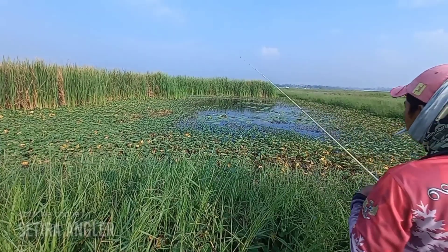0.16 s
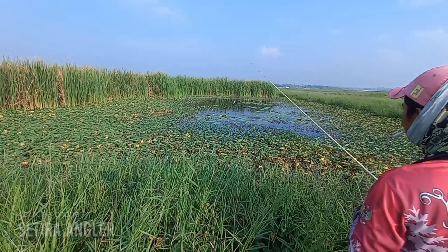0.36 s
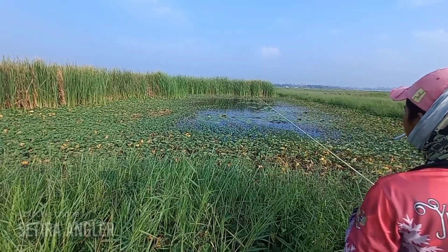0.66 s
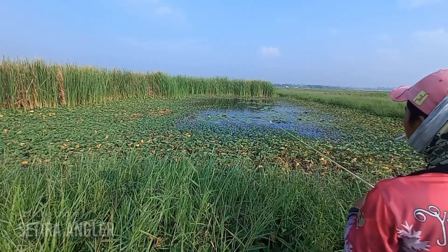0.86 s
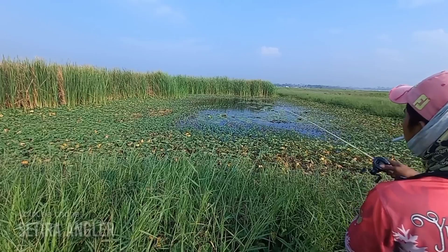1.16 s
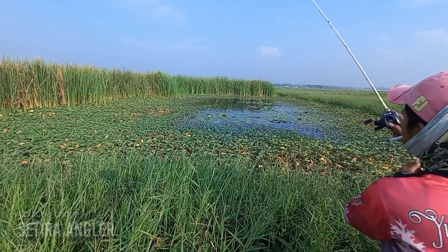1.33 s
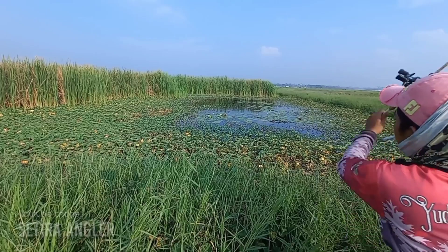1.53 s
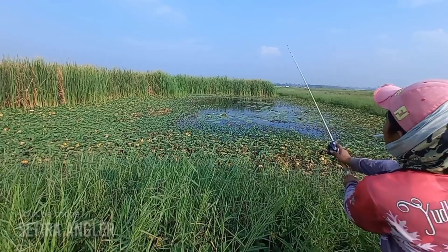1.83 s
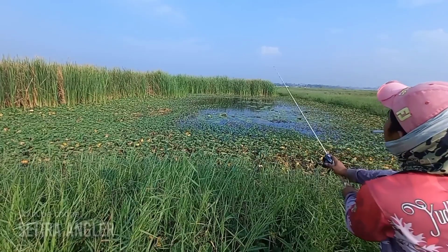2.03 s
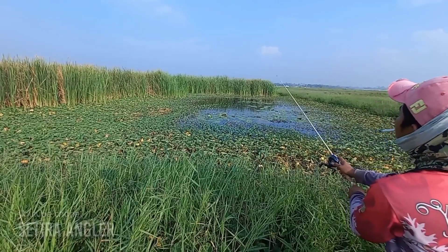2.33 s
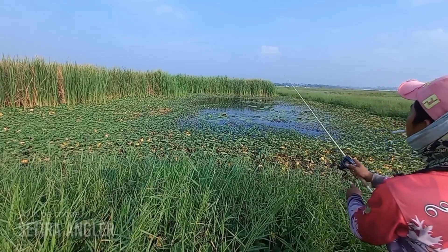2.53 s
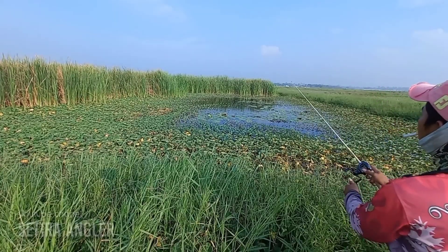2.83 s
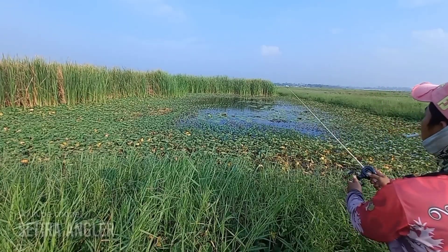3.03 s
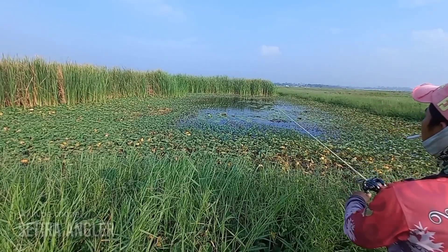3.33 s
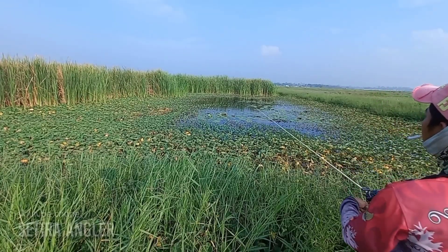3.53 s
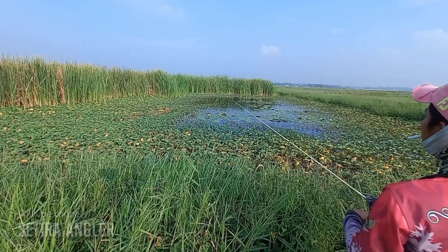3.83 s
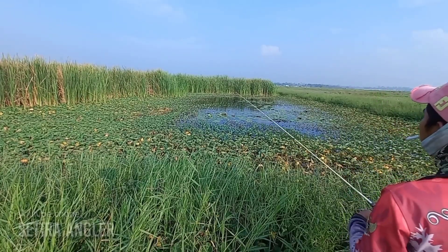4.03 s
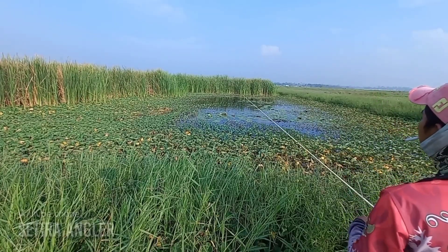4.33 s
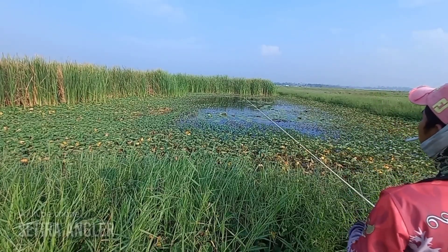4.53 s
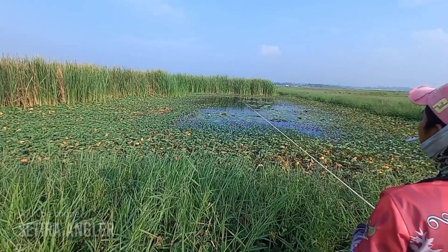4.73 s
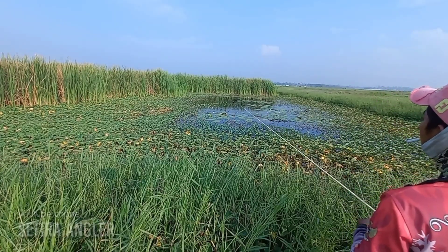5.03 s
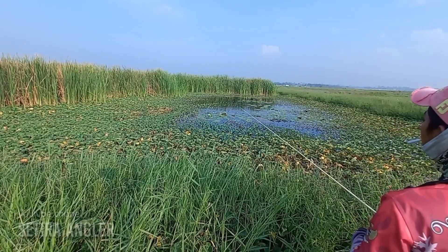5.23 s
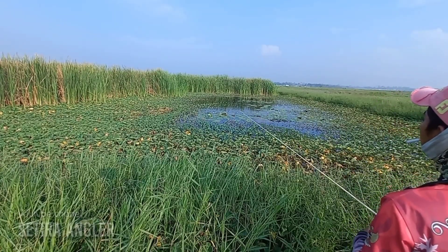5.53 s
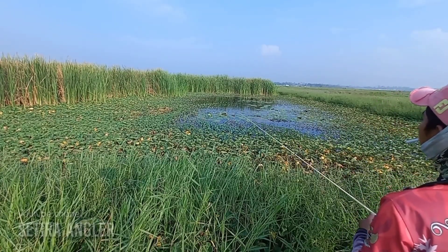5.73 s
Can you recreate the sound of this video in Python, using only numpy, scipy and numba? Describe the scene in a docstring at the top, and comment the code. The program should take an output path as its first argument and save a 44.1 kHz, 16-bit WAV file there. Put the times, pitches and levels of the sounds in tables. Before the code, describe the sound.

A fishing cast beside reeds: sharp reel click, quick whoosh and fading line hiss, then another click, amid shrill insects, wind rumble and distant engines.

```python
"""Casting over a marsh

An angler close by on the right clicks the reel free, swishes the rod, lets line whir out and clicks it back in.
Clicks are noise cracks with ringing metal modes; swish and line are shaped noise.
Bush crickets chirp as pulsed wing tones and scrapes over a far chorus, and birds call in gliding whistles
and blurred bands. Two far boat engines thud as filtered firings, under noise for light wind on the microphone."""
import sys
import numpy as np
from scipy import signal
from scipy.fft import rfft, irfft, next_fast_len
from scipy.io import wavfile
from scipy.ndimage import uniform_filter1d
from numba import njit

SR = 44100
rng = np.random.default_rng(int(sys.argv[2]) if len(sys.argv) > 2 else 0)


def unload_audio(sound):
    """Save the sound as a 16-bit wav file, at the path given as the first command line argument."""
    columns = np.transpose(np.atleast_2d(sound))
    # keep every value between -1 and 1, then stretch to whole-number steps
    steps = np.round(np.clip(columns, -1, 1) * 32767)
    wavfile.write(sys.argv[1], SR, steps.astype(np.int16))


N = 259308
TIME = np.arange(N) / SR


def undb(db):
    """Decibels to amplitude gain."""
    return 10 ** (np.asarray(db) / 20)


def unit(x):
    """Scale to rms 1."""
    return x / np.sqrt(np.mean(x ** 2))


def curves(rows):
    """One value per sample for each column of a timed table."""
    s, *columns = np.transpose(rows)
    return [np.interp(TIME, s, c) for c in columns]


def walk(rate):
    """Smooth random drift with a spread near 1; rate is in new values per second."""
    hold = int(SR / rate)
    steps = np.repeat(rng.standard_normal(N // hold + 1), hold)
    smooth = uniform_filter1d(uniform_filter1d(steps, hold), hold)
    return unit(smooth)[:N]


def colour(x, points, tilt_db=0):
    """Filter by a (pitch_hz, gain_db) spectrum, tilted per octave about its middle point."""
    hz, db = np.transpose(points)
    octave = np.log2(np.maximum(np.fft.rfftfreq(x.shape[-1], 1 / SR), 1))
    gain_db = np.interp(octave, np.log2(hz), db) + tilt_db * (octave - np.log2(np.median(hz)))
    # roll off beyond both ends of the table
    high_end = 1 + (2 ** octave / hz[-1] / 2) ** 4
    low_end = 1 + (hz[0] / 2 / 2 ** octave) ** 2
    closed = 1 / high_end / low_end
    return irfft(rfft(x) * undb(gain_db) * closed, x.shape[-1])


def noise(points, gate=1):
    """Noise, unrelated left and right, gated and then coloured by a body."""
    burst = rng.standard_normal((2, N)) * gate
    padded = np.pad(burst, ((0, 0), (0, next_fast_len(N, True) - N)))
    return unit(colour(padded, points)[:, :N])


def narrow(pair, side_db):
    """Turn two unrelated signals into left and right with the given side share."""
    side = undb(side_db) * pair[1]
    return np.array([pair[0] + side, pair[0] - side]) / np.sqrt(1 + undb(2 * side_db))


def from_right(pair, count=9):
    """The angler's sound reaches the left microphone port count samples late, and partly scattered."""
    left = .5 * np.roll(pair[1], count) + .8 * pair[0]
    return np.array([left, pair[1]])


def add(out, s, sound):
    """Mix a short sound in at time s."""
    i = int(s * SR)
    out[:, i:i + sound.shape[-1]] += sound[..., :N - i]


def swells(rows):
    """Power sum of bell-shaped swells (centre_s, half_length_s, level_db)."""
    power = sum(undb(2 * db) * np.exp(-np.minimum(((TIME - s) / half) ** 2, 50)) for s, half, db in rows)
    return np.sqrt(power)


def passing(rows):
    """Gain from the time and level columns of a table, silent before and after it."""
    s, db = np.transpose(rows)[:2]
    return undb(np.interp(TIME, s, db, left=-np.inf, right=-np.inf))


@njit
def bandpass(x, hz, q):
    """State-variable band-pass with a moving centre."""
    y, band, low = np.empty(len(x)), 0., 0.
    for i in range(len(x)):
        g = np.tan(np.pi * hz[i] / SR)
        v = (band + g * (x[i] - low)) / (1 + g * (g + 1 / q))
        band, low, y[i] = 2 * v - band, low + 2 * g * v, v / q
    return y


def blur(hz, width):
    """Narrow-band sound at each port; width is a share of the centre frequency."""
    drift = np.array([walk(width * hz) + 1j * walk(width * hz) for _ in range(2)])
    return np.real(drift * np.exp(2j * np.pi * hz * TIME))


def reed_echo(x, t60):
    """Dense scatter from the reed beds, different at each port, fading 60 dB in t60 seconds."""
    t = TIME[:SR // 2]
    echo = rng.standard_normal((2, len(t))) * undb(-60 * t / t60)
    return signal.fftconvolve(x[None], echo / np.sqrt(np.sum(echo[0] ** 2)))[:, :N]


# Rumble of wind on the microphone: pitch_hz, gain_db
WIND_COLOUR = [(20, -42), (36, -25), (50, -13.5), (72, -4.5), (105, -1), (160, -2.5), (260, -8),
               (400, -17.5), (520, -22.5), (700, -40), (1500, -46.5)]
# Hiss of reeds and open air: pitch_hz, gain_db
REED_COLOUR = [(100, -10.5), (500, 8.5), (800, 1), (1300, -0.5), (2200, -6), (3500, -12), (5000, -15.5),
               (7000, -15), (15000, -18)]
# Gusts that boom on the microphone: centre_s, half_length_s, level_db
GUSTS = [(.2, 0.074, -52.5), (1.33, 0.087, -50.5), (1.68, 0.077, -50.5), (2.05, 0.087, -56),
         (2.48, 0.43, -54.5), (2.9, 0.047, -60), (3.25, 0.094, -53), (3.62, 0.033, -54.5),
         (3.86, 0.06, -54.5), (4.41, 0.025, -51), (4.75, 0.094, -54), (5.08, 0.045, -51.5),
         (5.58, 0.031, -50)]
# breeze level at the start, its slow easing, and its random buffeting
WIND_DB, WIND_EASE_DB_PER_S, BUFFET_DB, BUFFETS_PER_S = -49.5, .5, 1.5, 14
# a gust's low boom, its width as a share of its pitch, and the broad rumble that comes with it
BOOM_HZ, BOOM_WIDTH, GUST_RUMBLE_DB = 76.2, 0.17, -1.5
REEDS_DB, REEDS_EASE_DB_PER_S = -68.5, 0.43


def wind():
    """An easing breeze buffets the microphone, each gust booms, and the reeds hiss softly."""
    breeze = undb(WIND_DB - WIND_EASE_DB_PER_S * TIME + BUFFET_DB * walk(BUFFETS_PER_S))
    gusts = swells(GUSTS)
    rumble = narrow(noise(WIND_COLOUR), -14) * np.hypot(breeze, undb(GUST_RUMBLE_DB) * gusts)
    booms = narrow(blur(BOOM_HZ, BOOM_WIDTH), -22.0) * gusts
    reeds_db = REEDS_DB - REEDS_EASE_DB_PER_S * TIME + 0.86 * walk(4.97)
    reeds = narrow(noise(REED_COLOUR), -0.96) * undb(reeds_db)
    return rumble + booms + reeds


def boat(rate, level, exhaust, start_turn, scatter_db, echo_db):
    """Each firing thumps the exhaust; the reed beds smear it and the air makes it waver."""
    turns = start_turn + np.cumsum(curves(rate)[0]) / SR
    firings = np.flatnonzero(np.diff(np.floor(turns)))
    pulses = np.zeros(N)
    pulses[firings] = undb(scatter_db * rng.standard_normal(len(firings)))
    # the echo paths shift with the breeze
    echo = sum(reed_echo(pulses, 0.44) * walk(2.99) for _ in range(2))
    thuds = pulses + undb(echo_db) * narrow(echo, -14.0)
    return unit(colour(thuds, exhaust)) * undb(curves(level)[0] + 1.0 * walk(5.22))


# Slow single-cylinder engine: time_s, firings_per_s
SLOW_RATE = [(0, 27.6), (.6, 27.78), (1, 27.95), (1.4, 28.22), (1.8, 28.38), (2.2, 28.44), (2.6, 28.82),
             (3, 28.87)]
# How well the breeze carries the slow engine: time_s, level_db
SLOW_BOAT = [(0, -52), (.5, -47.5), (1, -55), (1.4, -50.5), (1.8, -53), (2.2, -56.5), (2.6, -51), (3, -52),
             (3.4, -54.5), (3.9, -70)]
# Its exhaust note from afar: pitch_hz, gain_db
SLOW_EXHAUST = [(50, -47), (100, -14.5), (170, -3.5), (250, 0), (305, 0), (350, -7.5), (420, -13.5),
                (600, -38.5), (1000, -46)]


def slow_boat():
    """A far engine firing slowly, so that its thuds are heard nearly one by one."""
    return boat(SLOW_RATE, SLOW_BOAT, SLOW_EXHAUST, start_turn=.68, scatter_db=1.0, echo_db=-2.5)


# Fast single-cylinder engine: time_s, firings_per_s
FAST_RATE = [(3, 42.96), (3.9, 42.94), (4.3, 42.88), (4.7, 42.76), (5.1, 42.7), (5.88, 42.68)]
# How well the breeze carries the fast engine: time_s, level_db
FAST_BOAT = [(1.8, -75), (2.6, -69.5), (3.1, -72), (3.6, -60), (3.9, -57), (4.3, -53), (4.7, -53.5),
             (5.1, -47.5), (5.88, -53.5)]
# Its exhaust note from afar: pitch_hz, gain_db
FAST_EXHAUST = [(50, -47), (120, -4), (200, -5), (260, 2.5), (340, 0.5), (385, -3.5), (430, -13.5),
                (650, -36), (1000, -65)]


def fast_boat():
    """A second far engine, whose quicker firings run together and grow clearer late on."""
    return boat(FAST_RATE, FAST_BOAT, FAST_EXHAUST, start_turn=0.444, scatter_db=1.5, echo_db=-8.0)


# Far insect chorus: pitch_hz, gain_db
CHORUS = [(5000, -51), (6700, -5), (7400, 8.5), (7950, 16.5), (8500, 2.5), (9100, 0), (10300, -2.5),
          (11000, -3), (11600, -1.5), (12500, -2), (14200, -2), (15300, 0.5)]
# Loudness of the far chorus: time_s, level_db
CHORUS_LEVEL = [(0, -53), (.8, -55), (1.5, -54), (2.5, -55.5), (4.2, -57), (4.45, -59), (5.05, -60.5),
                (5.3, -56.5), (5.88, -57)]
CHORUS_PULSE_DB = 0.6


def far_chorus(beat):
    """Many distant insects blend into coloured noise that swells in step with the lower near cricket."""
    pulse_db = CHORUS_PULSE_DB * np.cos(2 * np.pi * beat)
    return noise(CHORUS) * undb(curves(CHORUS_LEVEL)[0] + pulse_db + .5 * walk(21.0))


CHIRP_JITTER = 0.023  # share of a beat by which a chirp comes early or late
CHIRP_HALF_S, CHIRP_SCATTER_DB = 0.041, 0.9


def beats(pace):
    """Running count of chirps; whole numbers are their tops."""
    return curves(pace)[0] + CHIRP_JITTER * walk(3.6)


def chirps(beat, song):
    """One flat-topped chirp per beat with a short gap, each a little louder or softer."""
    from_top_s = (beat - np.round(beat)) / (np.gradient(beat) * SR)
    shape = np.exp(-.5 * (from_top_s / CHIRP_HALF_S) ** 4)
    return shape * undb(curves(song)[0] + CHIRP_SCATTER_DB * walk(13))


def wing_cycle(rate, wobble):
    """Position 0-1 within each wing stroke, at a slightly wandering rate."""
    return np.cumsum(rate * (1 + wobble * walk(12))) / SR % 1


def wing_tone(u, start_hz, end_hz, waver_hz, echo_db, force=1):
    """Each stroke is one short tone that falls as the wing slows; the reeds smear it."""
    hz = start_hz + (end_hz - start_hz) * u + waver_hz * walk(220)
    stroke = force * np.sin(np.pi * u) ** 2
    tone = stroke * np.sin(2 * np.pi * np.cumsum(hz) / SR) * undb(1.9 * walk(40))
    return unit(tone + undb(echo_db) * reed_echo(tone, 0.066))


# Buzzing cricket, drawing nearer and catching once: time_s, level_db
BUZZ_SONG = [(0, -73.5), (2, -71.5), (2.6, -69.5), (4.98, -68), (5.005, -89), (5.045, -84), (5.065, -70),
             (5.88, -68.5)]
BUZZ_STROKES_PER_S = 94


def buzzing_cricket():
    """Steady wing strokes run on without chirps into a thin buzz."""
    u = wing_cycle(BUZZ_STROKES_PER_S, .005)
    tone = wing_tone(u, start_hz=10040, end_hz=9480, waver_hz=44.6, echo_db=-17.5)
    return tone * undb(curves(BUZZ_SONG)[0])


# Higher near cricket, its pace: time_s, chirps_so_far
HIGH_PACE = [(0, -.4), (.42, 3), (.98, 8), (1.38, 12), (2.14, 19), (2.44, 22), (3.31, 30), (3.61, 33),
             (4.29, 39), (4.42, 40), (4.55, 41), (5.12, 46), (5.32, 48), (5.88, 53.3)]
# Its loudness at the top of a chirp: time_s, level_db
HIGH_SONG = [(0, -67.5), (.4, -65.5), (.9, -63.5), (1.5, -64), (2.2, -62), (3, -64), (3.7, -63),
             (4.3, -61.5), (4.85, -63), (5.1, -66), (5.4, -68), (5.88, -68)]
# Its wing resonance: pitch_hz, gain_db
HIGH_WING = [(8400, -56), (8800, -1.5), (9100, -2), (9340, -5), (9480, -10.5), (9900, -48)]
HIGH_STROKES_PER_S = 132  # closing and opening together count as one
HIGH_SCRAPE_DB, HIGH_TONE_DB = -6, -2  # rough and pure parts of a stroke
RETURN_STROKE_DB = -3.5  # the wing opens more softly than it closes
# the wing also rings on one note; width is a share of its pitch
HIGH_NOTE_HZ, HIGH_NOTE_WIDTH, HIGH_NOTE_DB = 9380, .011, -4


def high_cricket(beat):
    """The wing sounds on closing and, more softly, on opening: a falling tone, a scrape and one ringing note."""
    u = wing_cycle(HIGH_STROKES_PER_S, .025)
    force = np.where(u < .5, 1, undb(RETURN_STROKE_DB))
    tone = wing_tone(2 * u % 1, start_hz=9400, end_hz=8970, waver_hz=110.2, echo_db=-2, force=force)
    scrape = undb(HIGH_SCRAPE_DB) * noise(HIGH_WING, force)
    note = undb(HIGH_NOTE_DB) * blur(HIGH_NOTE_HZ, HIGH_NOTE_WIDTH) * unit(force)
    voice = undb(HIGH_TONE_DB) * tone + narrow(scrape + note, -0.94)
    return voice * chirps(beat, HIGH_SONG)


# Lower near cricket, its pace: time_s, chirps_so_far
LOW_PACE = [(0, -.3), (.33, 3), (.65, 6), (1.1, 10), (1.37, 13), (2.08, 20), (2.42, 23), (2.8, 27),
            (3.54, 34), (3.73, 36), (4.28, 41), (4.43, 42), (4.56, 43), (5, 47), (5.88, 55.4)]
# Its loudness at the top of a chirp: time_s, level_db
LOW_SONG = [(0, -60), (.4, -56.5), (.65, -53.5), (.95, -54.5), (1.5, -56), (2.3, -53.5), (2.6, -58),
            (3, -55), (3.7, -54.5), (4.2, -52.5), (4.9, -52.5), (5.88, -52)]
# Its wing resonance: pitch_hz, gain_db
LOW_WING = [(6300, -51), (7000, -26), (7400, -8.5), (7700, -4.5), (7950, -1), (8200, -5), (8550, -27),
            (9200, -44)]
LOW_STROKES_PER_S = 160
LOW_SCRAPE_DB, LOW_TONE_DB = -3.5, -2  # rough and pure parts of a stroke


def low_cricket(beat):
    """Each wing stroke gives a falling tone over a steady rough scrape, gathered into chirps."""
    u = wing_cycle(LOW_STROKES_PER_S, .06)
    tone = wing_tone(u, start_hz=8230, end_hz=7440, waver_hz=129, echo_db=-6)
    tone = np.array([tone[0], np.roll(tone[1], 2)])  # reaches the right port two samples late
    voice = undb(LOW_TONE_DB) * tone + undb(LOW_SCRAPE_DB) * narrow(noise(LOW_WING), 3.2)
    return voice * chirps(beat, LOW_SONG)


def insects():
    """Two chirping crickets and one buzzer over a far chorus, leaning slightly right."""
    low_beat, high_beat = beats(LOW_PACE), beats(HIGH_PACE)
    near = low_cricket(low_beat) + high_cricket(high_beat)
    return (near + buzzing_cricket() + far_chorus(low_beat)) * undb([[-.9], [.9]])


# Far birds: centre_s, half_length_s, pitch_hz, level_db
FAR_CALLS = [(0.085, 0.085, 2760, -70.5), (.04, 0.042, 5680, -63.5), (.15, 0.042, 6040, -65),
             (.253, 0.046, 1152, -69), (.343, .05, 2795, -70.5), (.365, .03, 5330, -61),
             (3.073, .028, 5100, -74), (3.097, .031, 1150, -73), (4.878, .021, 3550, -78),
             (5.127, 0.018, 3540, -78)]


def far_birds(width):
    """Calls that distance has smeared into narrow bands."""
    return sum(blur(hz, width) * swells([(s, half, db)]) for s, half, hz, db in FAR_CALLS)


# Small bird whistles, before flutter:
# start_s, length_s, start_pitch_hz, end_pitch_hz, level_db, phase_between_ports_rad, echo_db
BIRD = [(0.054, .016, 6800, 6440, -58, 1, -12), (.337, .02, 6300, 6560, -63, 2, -12),
        (3.169, .041, 6570, 5270, -58, 1.7, -12), (3.351, 0.05, 6400, 5300, -60.5, 2.1, -6),
        (4.41, 0.055, 6430, 5170, -60, 3.5, -12), (4.6, 0.049, 6250, 5070, -56.5, 3.4, -12),
        (5.183, .031, 5970, 5360, -79, 1.8, -6)]


def bird():
    """Thin, fluttering whistles that glide ever faster, falling or rising, smeared by the reeds."""
    out, send = np.zeros((2, N)), np.zeros((1, N))
    for s, length, start_hz, end_hz, db, lag, echo_db in BIRD:
        u = np.linspace(0, 1, int(length * SR))
        hz = start_hz + (end_hz - start_hz) * u ** 1.32
        phase = 2 * np.pi * np.cumsum(hz) / SR
        swell = np.sin(np.pi * u ** 0.6).clip(0)
        call = undb(db) * swell * np.sin([phase, phase + lag]) * np.sqrt(2)
        add(out, s, call)
        add(send, s, undb(echo_db) * call[0])
    flutter = undb(2.3 * walk(150) + 2.5)
    return out * flutter + reed_echo(send[0] * flutter, .2)


STRIKE_SPREAD_DB = 1.5


def ringing(modes, t):
    """Fading modes (pitch_hz, t60_s, level_db) of a struck part, in a new balance at each blow."""
    out = 0
    for hz, t60, db in modes:
        fade = undb(db + STRIKE_SPREAD_DB * rng.standard_normal() - 60 * t / t60)
        out = out + fade * np.sin(2 * np.pi * (hz * t + rng.random((2, 1))))
    return out


def knocks(rows):
    """Short damped bursts (start_s, level_db, pitch_hz, t60_s) of noise peaking at one pitch."""
    out, t = np.zeros((2, N)), TIME[:SR // 8]
    for s, db, hz, t60 in rows:
        burst = colour(rng.standard_normal((2, len(t))), [(hz / 4, -24), (hz, 0), (hz * 3, -22)])
        add(out, s, unit(burst) * undb(db - 60 * t / t60))
    return out


# Light knocks of hand and line on the tackle: start_s, level_db, pitch_hz, t60_s
TAPS = [(0.296, -46, 12000, 0.036), (0.355, -49.5, 3800, .036), (0.358, -46, 12000, .03),
        (3.088, -62.5, 3180, .035), (3.1477, -63, 3070, 0.13), (3.169, -63, 3280, 0.074),
        (3.2495, -63.5, 5100, 0.065), (3.3, -60, 1200, 0.095), (4.041, -57, 3300, 0.04),
        (4.082, -54, 1710, 0.072), (4.088, -61, 1400, 0.029), (4.101, -63, 1200, 0.035)]
# The hollow reel seat under those knocks: pitch_hz, t60_s, level_db
SEAT_MODES = [(1200, 0.067, -5), (1820, .04, -8), (2440, .04, 4), (3150, 0.063, 3)]
SEAT_RING_DB = -4


def seat():
    """Knocks ring the reel seat, most in the modes near their own pitch."""
    out, t = np.zeros((2, N)), TIME[:SR // 8]
    for s, db, hz, _ in TAPS:
        modes = [(f, t60, gain - 12 * abs(np.log2(f / hz))) for f, t60, gain in SEAT_MODES]
        add(out, s, undb(db + SEAT_RING_DB) * ringing(modes, t))
    return out


# Sleeve rustles: centre_s, half_length_s, level_db
SLEEVE = [(.08, .25, -72.5), (.36, 0.1, -69), (1.3, .065, -70), (1.58, .065, -67), (3.13, 0.12, -73),
          (3.86, 0.036, -85), (4.055, 0.055, -71)]
# Grass rustles: centre_s, half_length_s, level_db
GRASS = [(3.33, 0.24, -69.5), (4.03, 0.12, -67.5)]


def handling():
    """Cloth brushes, grass rustles as the angler turns, and fingers knock on the tackle."""
    cloth = noise([(700, -22), (1500, -2.0), (3200, 0.5), (5800, 0), (9000, -12), (15000, -43.0)])
    grass = noise([(400, -10), (1300, 5.5), (2200, 4.5), (4000, -30), (12000, -30)])
    rustles = cloth * swells(SLEEVE) * undb(2.0 * walk(110)) + grass * swells(GRASS)
    return rustles + knocks(TAPS) + seat()


# the line whips out at the top of the cast
RELEASE_S, WHIP_DB, WHIP_RISE_DB_PER_S, WHIP_FALL_DB_PER_S = 1.785, -37, 335, 225
# it then runs off the slowing spool until the thumb brakes it
RUN_DB, SPOOL_SLOWING_DB_PER_S, BRAKE_S, BRAKE_DB_PER_S = -48.5, 20, 2.56, 16


def line_level():
    """The line whips out in a short peak, then fades as the spool slows and is braked."""
    before, after = np.maximum(RELEASE_S - TIME, 0), np.maximum(TIME - RELEASE_S, 0)
    braked = np.maximum(TIME - BRAKE_S, 0)
    whip = undb(WHIP_DB - WHIP_FALL_DB_PER_S * after)
    run = undb(RUN_DB - SPOOL_SLOWING_DB_PER_S * after - BRAKE_DB_PER_S * braked)
    return np.hypot(whip, run) * undb(-WHIP_RISE_DB_PER_S * before)


# Line hissing off the spool: pitch_hz, gain_db
LINE_COLOUR = [(500, -23), (1500, -1), (2700, 2.5), (3600, 3.5), (4500, 3.5), (5600, -1), (7000, 4.5),
               (9500, 1.5), (12500, 5), (15500, -4)]
# Loose coils rasping through the rod guides in surges: centre_s, half_length_s, level_db
RASPS = [(1.925, 0.022, -57), (2.165, 0.04, -54.5), (2.35, 0.047, -63.5), (2.53, 0.026, -59.5),
         (2.77, .025, -66.5)]
# Tone of that rasp: pitch_hz, gain_db
RASP_COLOUR = [(2200, -15), (3200, -9), (3800, -2.5), (4500, -1), (5200, -7), (6500, -7.5), (12000, -11)]
# Line slapping the rod: start_s, level_db, pitch_hz, t60_s
SLAPS = [(1.759, -43, 11000, .03), (1.7803, -33, 13500, .014), (1.7895, -30, 8200, .012),
         (1.7966, -26, 13000, .011), (1.7975, -33, 4330, 0.015), (1.8025, -32.5, 5000, 0.023),
         (1.922, -44.5, 4300, .012)]
COILS_PER_S, COIL_FLUTTER_DB = 400, 2
RASP_GRAIN_DB, RASP_GRAINS_PER_S = 1, 240


def line():
    """Line hisses off the spool, its loose coils flutter and rasp at the guides, and it slaps the rod."""
    flutter = undb(COIL_FLUTTER_DB * walk(COILS_PER_S) + 1.0 * walk(34.9))
    hiss = noise(LINE_COLOUR, flutter) * line_level()
    rasp = noise(RASP_COLOUR, undb(RASP_GRAIN_DB * walk(RASP_GRAINS_PER_S))) * swells(RASPS)
    return hiss + rasp + knocks(SLAPS)


# Rod sweep: time_s, level_db, eddy_pitch_hz
SWISH = [(1.725, -87, 300), (1.748, -66, 400), (1.762, -50.5, 545), (1.782, -43.5, 1100),
         (1.797, -42, 1150), (1.812, -44.5, 1420), (1.84, -54, 1300), (1.89, -67, 1000), (1.98, -78, 700)]
# Air the rod pushes at the microphone: centre_s, half_length_s, level_db
DRAUGHT = [(1.777, 0.021, -45.5), (1.825, 0.027, -51)]
# Tone of that push of air: pitch_hz, gain_db
DRAUGHT_COLOUR = [(60, -1), (180, 6.5), (350, 4), (500, 4.5), (620, -6), (800, -22)]


def rod():
    """The rod sheds eddies whose pitch follows its speed, and pushes air at the microphone."""
    hz = curves(SWISH)[1]
    eddies = np.array([bandpass(bandpass(n, hz, 0.55), hz, 0.55) for n in rng.standard_normal((2, N))])
    # the root evens out the wider band at higher pitch
    swish = unit(eddies / np.sqrt(hz) * undb(2.0 * walk(250))) * passing(SWISH)
    draught = narrow(noise(DRAUGHT_COLOUR), -21) * swells(DRAUGHT)
    return swish + draught


# Reel clutch, each snap with its rebounds: start_s, level_db, treble_tilt_db_per_octave, frame_ring_db
CLUTCH = [(1.1955, -25, 0, -2), (1.1963, -23.5, -0.5, 0), (1.1984, -22, 0, -2.5), (1.2013, -32, -3.5, -4),
          (3.9624, -22, -1.5, -6), (3.9640, -20.5, -1, -5), (3.967, -22.5, -1, -6), (3.9695, -31, -1.5, -4),
          (3.9716, -36, -6, -8)]
# Body of the reel: pitch_hz, gain_db
REEL_BODY = [(200, -17), (900, -22), (1600, -8.5), (2200, -6.5), (3100, -1.5), (3800, -7), (4650, -5),
             (5250, -11.5), (5700, -8), (6150, -7), (7200, 3), (9200, 0.5), (10200, -2.5), (11700, 4.5),
             (13400, 2), (15500, -3.5)]
# Ringing of the reel frame: pitch_hz, t60_s, level_db
REEL_MODES = [(2930, 0.03, -29), (3130, .05, -31), (4600, .025, -16), (5830, .04, -23), (7200, 0.035, -10),
              (7736, 0.03, -12), (8000, .039, -9), (8940, 0.019, -7), (9340, .037, -17), (11590, .035, -20),
              (12560, 0.044, -21), (13200, .03, -13), (13600, .04, -20), (14800, .022, -23)]
# a snap dies at once; its scatter from body and ground, then from the reeds, lasts longer
SNAP_T60_S, SCATTER_DB, SCATTER_T60_S, FAR_DB, FAR_T60_S = 0.0048, -11.5, 0.068, -31.5, 0.25
SCATTER_GRAIN_DB, SCATTER_GRAINS_PER_S = 2.5, 860  # the scatter arrives in uneven clumps
FAR_TILT_DB = -4.5  # per octave: the reeds return little treble


def clutch():
    """Metal parts snap and rebound: a crack, the ring of the frame, and scatter from the surroundings."""
    out, t = np.zeros((2, N)), TIME[:SR // 5]
    for s, db, tilt_db, ring_db in CLUTCH:
        clumps_db = SCATTER_GRAIN_DB * walk(SCATTER_GRAINS_PER_S)[:len(t)]
        snap = undb(-60 * t / SNAP_T60_S)
        scatter = undb(SCATTER_DB + clumps_db - 60 * t / SCATTER_T60_S)
        far = unit(colour(rng.standard_normal((2, len(t))), REEL_BODY, FAR_TILT_DB))
        far = far * undb(FAR_DB - 60 * t / FAR_T60_S)
        crack = unit(colour(rng.standard_normal((2, len(t))), REEL_BODY, tilt_db)) * (snap + scatter)
        ring = undb(ring_db) * ringing(REEL_MODES, t)
        onset = 1 - np.exp(-t / 0.00025)
        add(out, s, undb(db) * (crack + far + ring) * onset)
    return out


def scene():
    """The marsh, with the angler close by on the right."""
    distance = (wind() + slow_boat() + fast_boat()) * undb([[-.4], [.4]])
    birds = far_birds(width=.18) + bird()
    angler = from_right(handling() + line() + rod() + clutch())
    return distance + insects() + birds + angler


TOP_HZ = 15550


def record(dry):
    """The camera's steep low-pass removes the sound above TOP_HZ."""
    return signal.sosfilt(signal.ellip(14, .2, 75, TOP_HZ, fs=SR, output="sos"), dry)


dry = scene()
out = record(dry)
unload_audio(out)
```